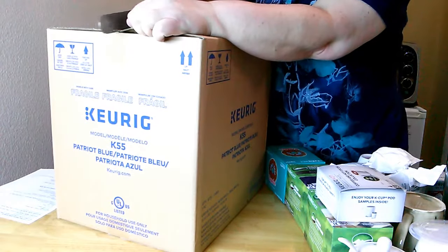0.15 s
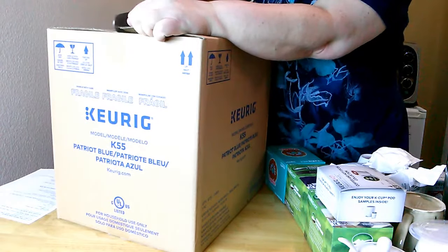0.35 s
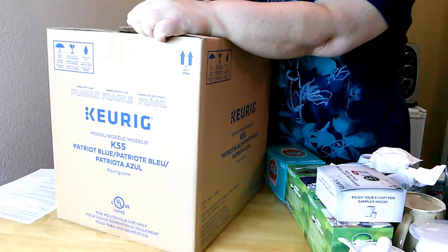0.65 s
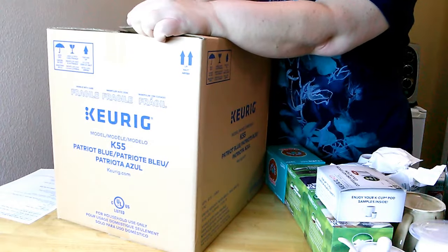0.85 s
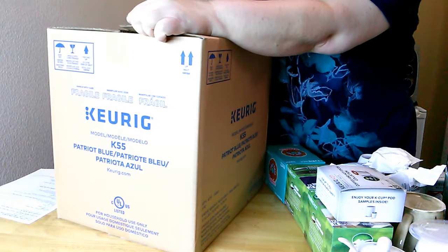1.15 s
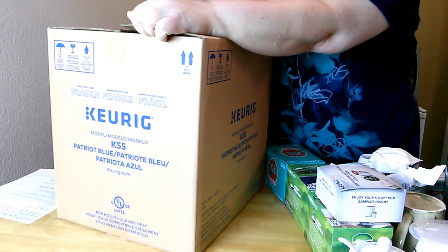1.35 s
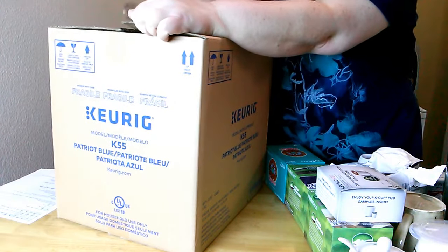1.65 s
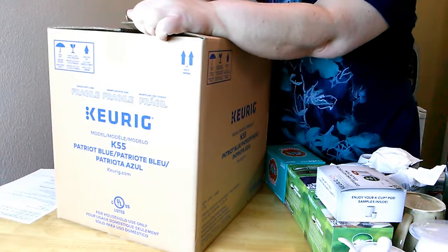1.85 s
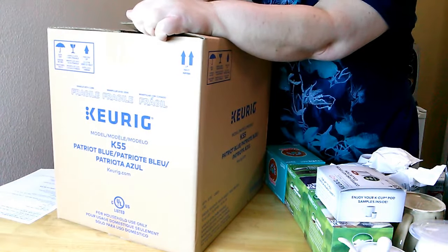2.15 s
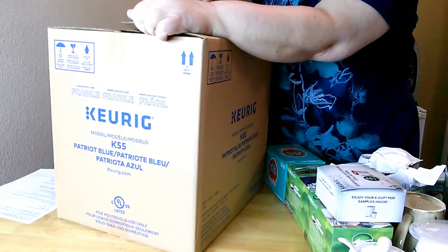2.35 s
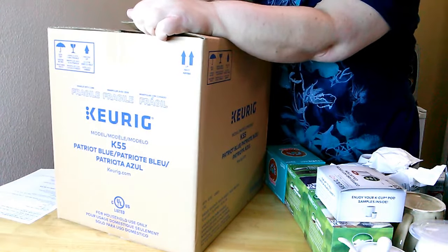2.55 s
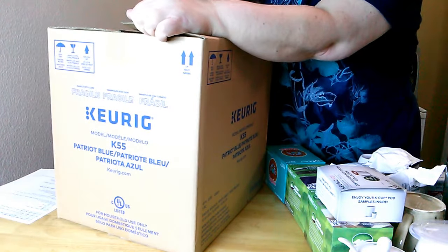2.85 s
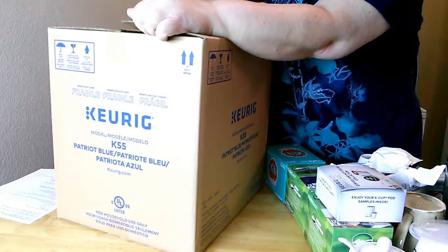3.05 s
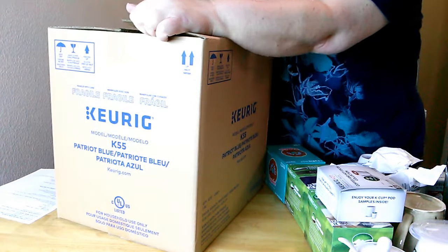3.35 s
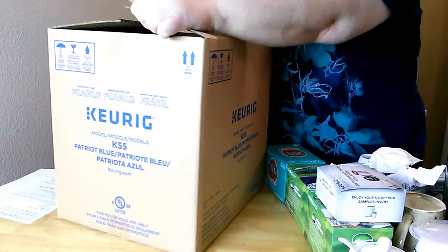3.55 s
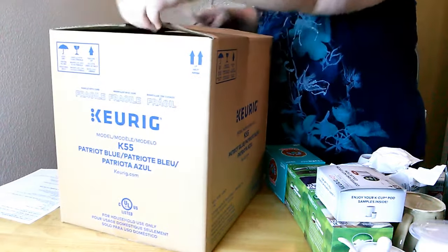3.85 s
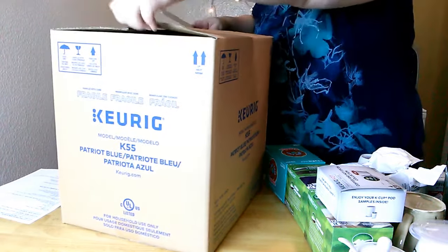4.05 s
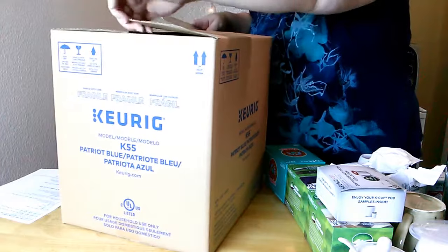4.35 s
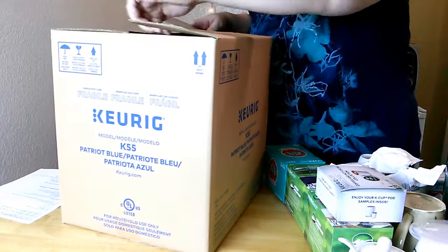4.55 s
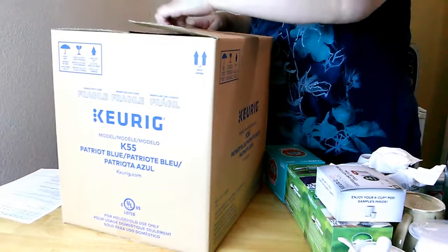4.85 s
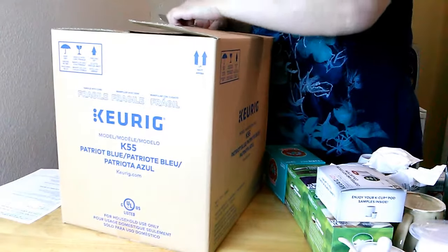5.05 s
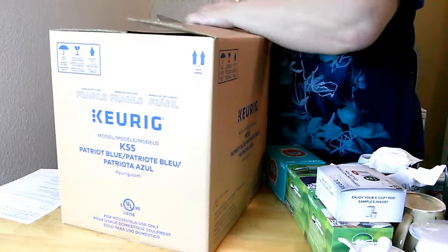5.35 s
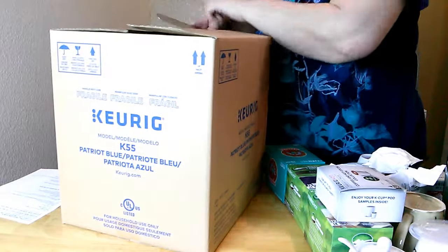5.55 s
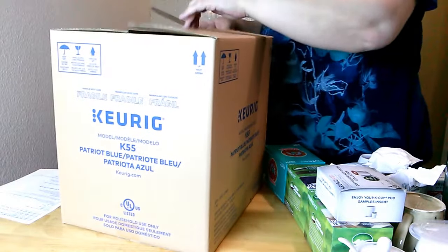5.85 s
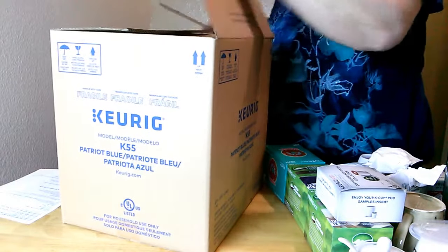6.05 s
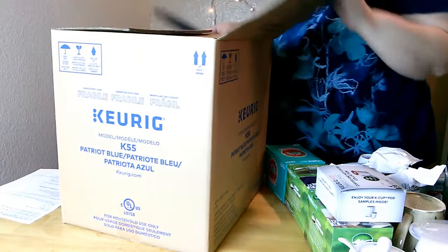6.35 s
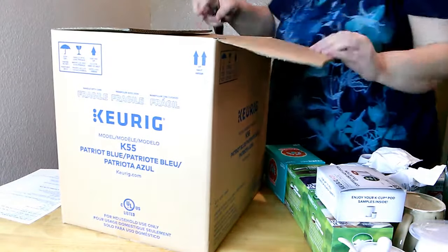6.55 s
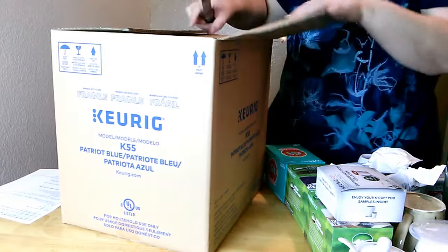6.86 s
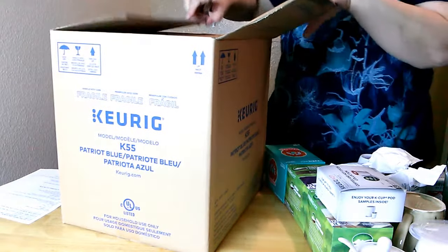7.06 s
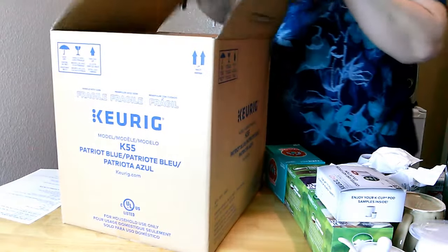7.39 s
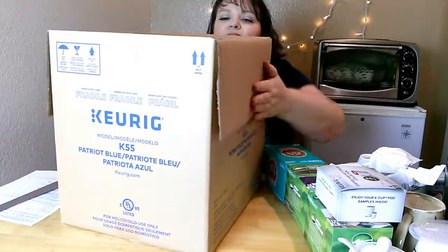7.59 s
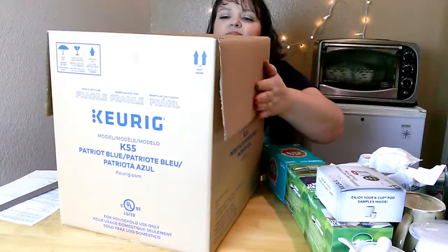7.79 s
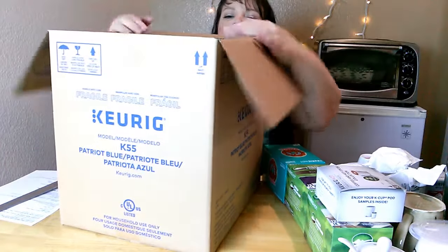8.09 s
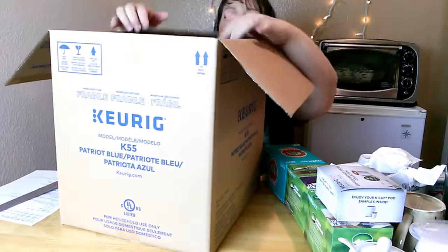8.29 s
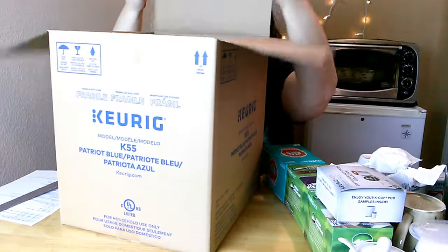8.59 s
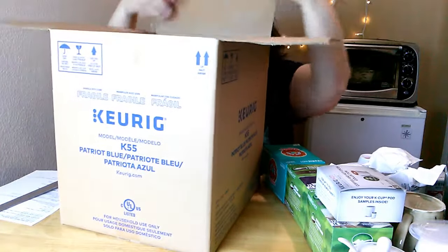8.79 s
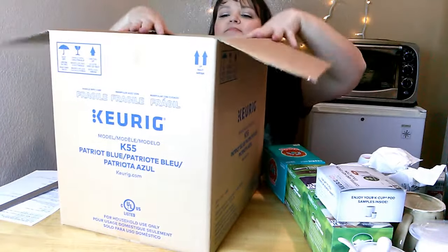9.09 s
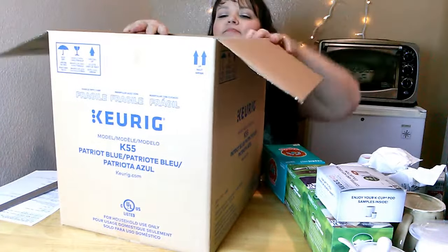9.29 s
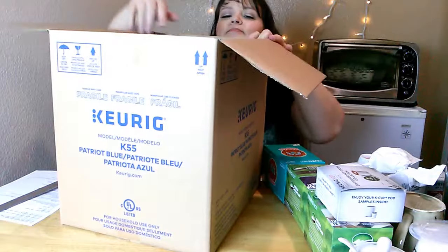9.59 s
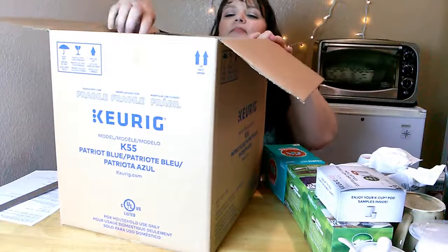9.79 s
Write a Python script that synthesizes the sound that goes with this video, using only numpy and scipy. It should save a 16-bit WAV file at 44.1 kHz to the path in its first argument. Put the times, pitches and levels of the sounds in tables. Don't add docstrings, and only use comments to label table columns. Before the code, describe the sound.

Hands work a large carton on a table. Tape snaps and hollow knocks come irregularly with dry scraping, then a cluster of ripping cracks as the flaps come loose. A quieter stretch of light rubbing and small squeaks follows, ending in flap thumps and rustles. Close microphone, small indoor room, quiet gaps nearly silent.

```python
import sys
import numpy as np
from scipy import signal
from scipy.io import wavfile
from scipy.ndimage import uniform_filter1d

SR = 44100
rng = np.random.default_rng(int(sys.argv[2]) if len(sys.argv) > 2 else 0)


def boost(x):
    u = np.asarray(x, float) / 20
    return 10 ** u


def int16_out(signal):
    q = np.round(np.clip(np.atleast_2d(signal).T, -1, 1) * 32767)
    wavfile.write(sys.argv[1], SR, q.astype(np.int16))


N = 437902

# centre in Hz, width in Hz, level in dB.
DEEP_MODES = [(67.8, 4.6, -6.5), (95, 7.5, -3.5), (136, 34, -3), (173, 54.5, -3.5), (245, 30.5, -1.5),
              (310.4, 41, -5)]
# centre in Hz, width in Hz, level in dB.
PANEL_MODES = [(349.2, 26.7, -1.5), (383, 41, 0.5), (423, 40, -2.5), (490.6, 22, -3), (558, 78, -4.5),
               (660, 250, -12)]


def evened(x):
    return x / np.sqrt(np.mean(x ** 2) + 1e-20)


def read(points, hz):
    f, value = np.transpose(points)
    return np.interp(np.log(hz + 1), np.log(f + 1), value)


def colour(x, points):
    hz = abs(np.fft.fftfreq(4096, 1 / SR))
    log_gain = np.log(boost(np.maximum(read(points, hz), -100)))
    minimum_phase = np.exp(np.conj(signal.hilbert(log_gain)))
    taps = np.fft.ifft(minimum_phase).real[:2048]
    return signal.oaconvolve(x, taps / np.linalg.norm(taps))[:N]


def add(mix, s, sound):
    part = mix[round(s * SR):][:len(sound)]
    part += sound[:len(part)]


def resonate(x, hz, width):
    r = np.exp(-np.pi * width / SR)
    turn = np.exp(2j * np.pi * hz / SR)
    return 2 * signal.lfilter([1 - r], [1, -r * turn], x).real


def ring(x, modes):
    total = 0
    for k, (hz, width, db) in enumerate(modes):
        total = total + (-1) ** k * boost(db) * resonate(x, hz, width)
    return total


def box(x):
    return ring(x, DEEP_MODES + PANEL_MODES)


def card(x):
    # frequency in Hz, level in dB per Hz.
    creak_colour = [(260, -25), (450, -1.5), (584, -11), (668, -7), (1040, -7.5), (1240, -5.5), (2310, -14),
                    (4500, -28.5), (5850, -36), (9900, -120)]
    # centre in Hz, width in Hz, level in dB.
    flap_modes = [(821, 110, 5), (1290, 250, -6.5), (1510, 40, -11.5), (2200, 370, -6)]
    return colour(x + boost(-8.5) * ring(x, flap_modes), creak_colour)


def slips(per_s, spread_db, last_s, flutter_db, flutter_s):
    size = boost(spread_db * np.minimum(rng.exponential(1, N), 4))
    jumps = size * (rng.random(N) < per_s / SR)
    grip = signal.lfilter([1], [1, -np.exp(-1 / (last_s * SR))], jumps)
    span = int(flutter_s * SR)
    flutter = evened(uniform_filter1d(uniform_filter1d(rng.standard_normal(N), span), span))
    return evened((1 + grip) * boost(flutter_db * flutter) * rng.standard_normal(N))


def patchy(x, patchy_db, bins, frames):
    z = signal.stft(x, nperseg=256)[2]
    field = uniform_filter1d(rng.standard_normal(z.shape), bins, 0)
    field = uniform_filter1d(field, frames, 1)
    return evened(signal.istft(z * boost(patchy_db * evened(field)), nperseg=256)[1][:N])


def pressure(strokes):
    press_db, sag_db_per_s, lift_db_per_s = 22.5, 12.5, 235
    t = np.arange(0, N / SR + .01, .002)
    s, press, hold, db, over_db = np.transpose(strokes)[:, :, None]
    before, after = np.maximum(s - t, 0), np.maximum(t - s, 0)
    shape = db - press_db * before / np.maximum(press, .002)
    shape = shape - sag_db_per_s * np.minimum(after, hold)
    shape = shape - lift_db_per_s * np.maximum(after - hold, 0)
    levels = []
    for level in (shape, shape + over_db):
        total_db = 10 * np.log10((boost(level) ** 2).sum(0) + 1e-10)
        levels.append(np.interp(np.arange(N) / SR, t, total_db))
    return levels


def snaps():
    # start in seconds, crack in dB, dull
    # part in dB over the crack.
    snap_events = [(0.0486, -34.5, 3), (0.3634, -35, -13), (0.4714, 7, -14.5), (0.5332, 3, -20),
                   (0.6013, -13, -14.5), (0.6298, -2, -17), (0.6595, 0, -11.5), (0.7172, -12.5, -31),
                   (0.837, -19.5, -8), (1.0231, -14, -5), (1.126, -26, -4), (1.483, -28, -5),
                   (1.601, -16.5, -17), (1.7546, -34, 16.5), (1.8819, -22, 4), (1.937, -17.5, -24),
                   (2.0802, -20.5, 1), (2.2493, -17.5, 6.5), (2.3902, -13.5, 2.5), (2.4304, -11, 1),
                   (3.0653, -16.5, -1.5), (3.184, -14.5, -5.5), (3.266, -14, -40),
                   (3.516, -52, -4), (3.5585, -17.5, -5), (3.5827, -5.5, -24), (3.6007, 1.5, -10),
                  (3.897, -32, 6.5), (4.1236, -19, -7), (4.3038, -29.5, 9.5), (4.442, -23, -8.5),
                  (4.695, -3.5, -6.5), (4.7314, -11, -11), (4.803, -11.5, -2.5), (4.851, -8, -5.5),
                  (4.9118, -5, -3.5), (4.984, -3, -11), (5.024, 5, -5.5), (5.093, -2, -3),
                  (5.1486, -5.5, -19.5), (5.1903, -9.5, -4), (5.3728, -9.5, 6.5), (5.3924, -3.5, -3),
                  (5.469, 6.5, 2), (5.767, -42, 12.5),
                   (6.12, -18, -20), (6.168, -20, -1.5), (6.2459, -44, 22), (6.4378, -20, -10),
                  (6.777, -35, 7), (7.3952, -24, -19), (7.701, -25, 21.5), (7.7226, -29.5, 18),
                  (8.449, -8.5, -3), (8.544, -17, 7.5), (8.5828, -2, -8), (8.7504, -20.5, 8.5),
                  (9.363, -35, 9), (9.8798, -39, 17)]
    # frequency in Hz, level in dB per Hz.
    crack_colour = [(1200, -25), (2000, -3), (4000, -6.5), (5600, -2.5), (6700, -4.5), (8000, -12),
                    (12000, -17.5), (16000, -33)]
    t60_s = 0.047
    t, bright, dull = np.arange(5000) / SR, np.zeros(N), np.zeros(N)
    for s, db, dull_db in snap_events:
        a, b, ragged = rng.standard_normal((3, len(t)))
        shape = boost(-60 * t / t60_s) * boost(2.25 * evened(uniform_filter1d(ragged, 90)))
        tear_hz = 5200 * np.exp(0.2 * np.clip(b[0], -2, 1))
        a = evened(a + 0.8 * evened(resonate(a, tear_hz, 700)))
        tick = 2.0 * boost(-60 * t / 0.00096) * np.sign(a)
        burst = shape * (1 - np.exp(-t / 0.0018)) * a
        add(bright, s, boost(db - 11.0) * (burst + tick))
        add(dull, s, boost(db + dull_db - 6.0) * shape * (1 - np.exp(-t / 0.0014)) * b)
    return colour(bright, crack_colour) + card(dull)


def knocks():
    # start in seconds, blow in dB, pitch of the struck panel
    # in Hz, t60 in seconds, hardness in dB.
    knock_events = [(0.054, -21, 85.4, 0.18, 6), (0.473, -2, 423, 0.026, 4), (0.489, -3.5, 580, 0.055, -1),
                    (0.837, -13, 173, 0.049, 15), (0.878, -13.5, 164, 0.096, 4), (0.94, -18, 251, 0.2, -12),
                    (1.261, -19.5, 367, 0.19, -15), (1.492, -24, 352, 0.14, -18),
                    (1.757, -12.5, 383, 0.033, 9), (1.878, -13, 404, 0.092, 6), (1.88, -10, 95, 0.12, -20),
                    (2.088, -1, 440, 0.063, -3), (2.089, -22, 165, 0.11, -18), (2.257, -2.5, 155, 0.045, -15),
                    (2.388, -10.5, 335, 0.058, 10.5), (2.608, -10.5, 221, 0.59, -3),
                    (3.004, -12, 266, 0.14, 1), (3.389, -21.5, 136, 0.12, -5), (3.5779, 0, 425, 0.043, -2),
                    (3.897, -24, 393, 0.053, 3), (4.147, -13, 390, 0.31, -17),
                    (4.689, -23, 554, 0.049, -16.5), (4.804, -23.5, 246, 0.45, 3),
                    (4.905, -15, 423, 0.099, -4.5), (4.979, -18, 423, 0.078, 12.5),
                  (5.019, -13.5, 418, 0.22, 2), (5.093, -10, 417, 0.061, -2.5), (5.369, -9, 520, 0.12, -2),
                  (5.476, 0.5, 430.5, 0.38, -2), (5.495, -7, 174, 0.21, -16.5), (5.694, -24, 320, 0.41, 2),
                  (5.954, -16.5, 370, 0.082, -11), (6.242, -21, 460, 0.13, -3),
                  (7.719, -3, 802, 0.043, 10.5), (7.7252, 1.5, 142, 0.17, -17), (8.141, -9, 129, 0.13, -23),
                  (9.875, -5.5, 727, 0.15, -4), (8.582, -22, 387, 0.053, 13), (8.744, -3, 177, 0.082, -5),
                  (8.7533, -6, 400, 0.061, -16), (8.914, -14.5, 143, 0.17, -24),
                  (9.742, -18.5, 162, 0.34, 4), (9.874, 2.5, 192.6, 0.11, -12)]
    t, panel, rattle = np.arange(8000) / SR, np.zeros(N), np.zeros(N)
    for s, db, hz, t60, hard_db in knock_events:
        noise = rng.standard_normal(len(t))
        tone = np.sin(2 * np.pi * hz * t)
        fall = boost(db - 60 * t / np.clip(t60, .03, .5)) * (1 - np.exp(-t / 0.0017))
        shove = 0.47 * boost(db - 60 * t / 0.086) * tone
        wobble = evened(resonate(resonate(noise, hz, 140), hz, 160))
        add(panel, s + 0.00293, shove + fall * (0.28 * tone + 0.39 * wobble))
        add(rattle, s + 0.003277, boost(hard_db) * fall * noise)
    return boost(-3.0) * panel + boost(10.0) * box(rattle) + boost(-20.0) * card(rattle)


def rubbing():
    # full pressure at seconds, press in seconds, hold in
    # seconds, scrape in dB, creak in dB over the scrape.
    rub_strokes = [(0.046, 0.004, 0.015, -45, 4), (.09, .03, 0.017, -46, 13.5), (.14, .05, 0.23, -46, -16),
                   (0.361, 0.003, 0.34, -37, 0), (0.474, 0.0031, 0.005, -13, 5),
                   (0.669, 0.2, 0.035, -27.5, -0.5), (0.76, 0.075, 0.043, -37, 7.5),
                   (0.843, 0.022, 0.05, -38, 9.5), (.94, .03, 0.22, -39, -6), (1.026, 0.01, 0.22, -45, 7),
                   (1.33, 0.026, 0.0077, -44.5, 2.5), (1.506, 0.079, 0.06, -39, 4),
                   (1.61, 0.054, 0.17, -38.5, 7), (1.882, 0.016, 0.012, -46, 16.5),
                   (1.94, .005, 0.024, -39.5, 1), (2.081, 0.0068, 0.012, -20.5, 3.5),
                   (2.249, 0.0088, 0.19, -33, 4), (2.389, 0.01, 0.9, -28.5, -3.5),
                   (2.652, 0.22, 0.2, -23, -4.5), (3.059, 0.26, 0.14, -30.5, -10),
                   (3.37, 0.006, 0.043, -45, 1.5), (3.44, .005, 0.019, -47, 0),
                   (3.606, 0.08, 0.022, -16, -1), (3.72, .03, 0.017, -42.5, 7), (3.8, 0.059, 0.019, -41, 1),
                   (3.9, 0.04, 0.021, -40, 5.5), (4.134, 0.12, 0.11, -38.5, 2),
                   (4.299, 0.0037, 0.45, -57, 11.5),
                   (4.743, 0.38, 0.018, -36, 5.5), (4.854, 0.018, 0.0077, -24.5, -1),
                    (4.932, 0.0044, 0.078, -34, -1.5), (5.042, 0.034, 0.006, -16, -0.5),
                    (5.082, 0.021, 0.1, -22.5, -1.5), (5.313, 0.046, 0.09, -44, -0.5),
                    (5.377, 0.0081, 0.0037, -12, 0), (5.465, 0.0047, 0.068, -18.5, 4),
                    (5.762, 0.005, 0.029, -47.5, 10.5), (5.962, 0.0043, 0.15, -49.5, 4),
                    (6.115, 0.006, 0.081, -37, 1), (6.248, 0.006, 0.011, -55.5, 23.5),
                    (6.426, 0.062, 0.14, -46.5, -2), (6.798, 0.5, 0.054, -47.5, -3.5),
                    (6.993, 0.041, 0.03, -40, 12), (7.029, 0.048, 0.033, -34, 6.5),
                    (7.11, 0.14, 0.038, -34.5, -4.5), (7.311, 0.4, 0.16, -56, 6),
                    (7.54, 0.081, 0.033, -29.5, 1), (7.668, .06, 0.02, -48, 10),
                    (7.738, 0.12, 0.037, -29, 7), (8.151, 0.23, 0.234, -25, -5),
                    (8.448, 0.084, 0.041, -29, 4.5), (8.611, 0.14, 0.17, -29, -0.5),
                    (8.96, 0.033, 0.038, -42.5, 4), (9.02, 0.22, 0.1, -42, 4.5),
                    (9.147, 0.1, 0.2, -48.5, 5), (9.357, 0.013, 0.091, -35.5, 3),
                    (9.504, 0.32, 0.17, -35, 3), (9.726, 0.013, 0.024, -33.5, 1.5),
                    (9.88, 0.037, 0.039, -41, 9)]
    # full pressure at seconds, press in seconds, hold in seconds, rumble
    # in dB, shudder in dB over the rumble.
    wall_pushes = [(0.08, 0.11, 0.2, -43.5, 3), (0.386, 0.027, 0.068, -34, -2),
                   (0.49, 0.033, 0.0047, -14.5, 1), (0.67, 0.044, 0.041, -33, -8),
                   (0.86, 0.34, 0.41, -34, 10.5), (1.55, 0.082, 0.18, -25.5, 4),
                   (1.881, 0.021, 0.012, -27.5, 3), (2.084, 0.01, 0.0054, -14.5, 4),
                   (2.25, 0.0051, 0.039, -22, -1), (2.4, 0.042, 0.11, -26.5, -0.5),
                   (2.65, 0.2, 0.18, -24.5, 4.5), (3.05, 0.44, 0.14, -25, 2), (3.39, .02, 0.029, -42.5, 6.5),
                   (3.584, 0.0069, 0.016, -6, -4), (3.9, 0.55, 0.03, -41, 1.5),
                   (4.15, 0.19, 0.071, -36.5, 3.5),
                   (4.546, 0.4, 0.18, -38.5, -4), (4.693, 0.012, 0.27, -33.5, -1.5),
                   (5.013, 0.011, 0.2, -35, 2), (5.477, 0.017, 0.044, -12, -4),
                   (5.966, 0.0061, 0.1, -37.5, 8.5), (6.26, 0.0092, 0.025, -36, -5),
                   (6.428, .02, 0.14, -42.5, -1.5), (6.794, 0.21, 0.013, -37, -5),
                   (7.018, 0.066, 0.081, -36, -0.5), (7.568, 0.06, 0.061, -30, -2),
                   (7.68, 0.058, 0.049, -35, 3), (7.746, 0.033, 0.042, -20.5, -2),
                   (8.088, 1, 0.49, -35, -0.5), (8.264, 0.036, 0.02, -29, 0),
                   (8.44, 0.083, 0.26, -26.5, -2), (8.747, 0.0026, 0.0039, -8, -10.5),
                   (9.036, 0.14, 0.07, -28, -1), (9.42, 0.2, 0.28, -34, 3), (9.754, 0.027, 0.016, -32, -18),
                   (9.873, 0.0041, 0.03, -16, -2)]
    # frequency in Hz, level in dB per Hz.
    scrape_colour = [(1060, -28), (1800, -2.5), (2870, -2), (4000, -2.5), (5850, -0.5), (7840, -12.5),
                     (11800, -20.5), (16000, -43)]

    levels = pressure(rub_strokes) + pressure(wall_pushes)
    levels = [c - 0.036 * np.maximum(c + 24, 0) for c in levels]
    scrape, creak, rumble, shudder = (boost(c - 3.5) for c in levels)

    hiss = slips(per_s=320, spread_db=-4.5, last_s=0.0022, flutter_db=0.5, flutter_s=0.018)
    hiss = patchy(colour(hiss, scrape_colour), patchy_db=1.9, bins=3, frames=8)
    flaps = card(slips(per_s=120, spread_db=2.0, last_s=0.0018, flutter_db=-0.5, flutter_s=0.027))
    flaps = patchy(flaps, patchy_db=1.8, bins=2, frames=20)
    walls = slips(per_s=90, spread_db=1.5, last_s=0.0097, flutter_db=1.7, flutter_s=0.041)
    walls = resonate(ring(walls, PANEL_MODES), 428, 370)
    body = slips(per_s=40, spread_db=-0.5, last_s=0.0015, flutter_db=0.6, flutter_s=0.041)
    body = resonate(ring(body, DEEP_MODES), 140, 220)

    slow_db = uniform_filter1d(np.minimum(levels[0], -36), size=5000)
    slow_db = np.minimum(slow_db, levels[0] + 10)
    fizz = np.diff(colour(rng.standard_normal(N), scrape_colour), n=3, prepend=[0, 0, 0])
    air = boost(-22.5 + 0.71 * slow_db) * fizz
    return air + scrape * hiss + creak * flaps + rumble * evened(walls) + shudder * evened(body)


def ticks():
    # start in seconds, level in dB, centre in Hz.
    fibre_ticks = [(0.7467, -17, 4110), (0.8485, -21, 4440), (1.131, -28, 12530), (1.329, -37, 5930),
                   (1.338, -39, 3500), (1.5085, -28.5, 5500), (1.7065, -24.5, 6000), (1.7918, -28, 5900),
                   (1.8545, -26.5, 4800), (1.878, -25, 1300), (2.0478, -37, 5500), (2.0907, -17, 8020),
                   (2.5831, -18, 2480), (3.0121, -37, 8970), (3.066, -25, 11000), (3.1468, -30, 9000),
                   (3.1632, -27, 7000), (3.187, -24, 11070), (3.265, -24, 10900), (3.3698, -33, 5960),
                   (3.4371, -31.5, 4500), (3.5149, -34, 1990), (3.5314, -32, 6020), (4.054, -31.5, 5500),
                   (4.4055, -41.5, 8000), (4.864, -15, 5000), (5.162, -11, 4500), (5.318, -42, 3500),
                   (5.422, -14, 1770), (5.7235, -40, 6980), (6.0199, -36, 5500), (6.5162, -34, 5500),
                   (6.7861, -31.5, 5740), (6.9792, -40, 1500), (7.394, -32, 9900), (7.4895, -34, 6000),
                   (7.5225, -33, 5500), (7.6487, -32, 2500), (7.724, -18, 1190), (7.762, -23, 5500),
                   (7.838, -34, 6960), (7.9355, -29, 2660), (7.9754, -45, 6000), (8.048, -22.5, 2100),
                   (8.352, -18, 1790), (8.4349, -18, 5260), (8.452, -13.5, 2890), (8.478, -16, 2800),
                   (8.5385, -12, 3200), (9.0231, -27, 5500), (9.3593, -41, 7000), (9.378, -40, 6000),
                   (9.4047, -39, 6000), (9.7175, -24, 4360), (9.7455, -14, 660), (9.862, -30, 900),
                   (9.876, -17, 1480)]
    t60_s, width_share = 0.062, 0.57
    t, out = np.arange(2500) / SR, np.zeros(N)
    for s, db, hz in fibre_ticks:
        width = width_share * hz
        puff = evened(resonate(resonate(rng.standard_normal(len(t)), hz, width), hz, width))
        add(out, s, boost(db - 7.0 - 60 * t / t60_s) * (1 - np.exp(-t / 0.0007)) * puff)
    return out


def squeak():
    # time in seconds, level in dB.
    course = [
        (6.42, -60),
        (6.44, -49),
        (6.6, -52),
        (6.76, -57),
        (6.79, -37),
        (6.87, -62),
        (6.93, -83),
        (7.045, -31),
        (7.2, -68.5),
    ]
    # centre in Hz, width in Hz, level in dB.
    hinge_modes = [(1420, 97, 2), (2450, 160, -11.5)]
    s, db = np.transpose(course)
    level = boost(np.interp(np.arange(N) / SR, s, db - 0.5, left=-120, right=-120))
    bending = slips(per_s=30, spread_db=1.5, last_s=0.012, flutter_db=3.0, flutter_s=0.01)
    return level * evened(ring(bending, hinge_modes))


def streaks():
    # start in seconds, length in seconds, level in dB, ring in Hz.
    flap_streaks = [(0.069, 0.037, -44, 1170), (0.139, 0.12, -55.5, 2370), (0.155, 0.16, -59, 4650),
                    (0.359, .12, -41.5, 2310), (0.36, 0.16, -44, 4660), (1.74, 0.055, -33, 824),
                    (2.406, 0.16, -42, 2030), (2.954, 0.13, -35.5, 1094), (2.898, .35, -46.5, 2030),
                    (5.008, .1, -34, 1300), (6.235, .05, -36, 1124), (6.768, 0.036, -45, 890),
                    (6.993, 0.11, -35, 1790), (7.503, 0.09, -37, 1135), (8.178, .08, -38, 2050),
                    (9.398, .3, -47.5, 3320)]
    t, out = np.arange(SR) / SR, np.zeros(N)
    for s, length, db, hz in flap_streaks:
        noise, ragged = rng.standard_normal((2, SR))
        width = 0.11 * hz
        rung = evened(resonate(resonate(noise, hz, width), hz, 2 * width))
        arch = abs(np.sin(np.pi * np.minimum(t / length, 1))) ** 1.3
        add(out, s, arch * boost(db + 4.8 * evened(uniform_filter1d(ragged, size=500))) * rung)
    return out


def brushing():
    # full pressure at seconds, press in seconds, hold in seconds, fizz in dB,
    # whistle in dB over the fizz.
    brushes = [(0.15, 0.079, 0.1, -72, 3.5), (0.8, .05, .1, -50, -4), (1.03, .01, 0.14, -50.5, 6.5),
               (1.15, .03, 0.044, -55, -2), (1.72, .05, 0.032, -57, 15), (2.68, .1, 0.28, -57, 4.5),
               (3.07, .03, 0.14, -46.5, -1), (3.38, .01, 0.083, -71, 9.5), (4.5, 0.14, 0.14, -54.5, 13.5),
               (4.8, 0.11, 0.27, -48.5, 8.5), (7.0, 0.12, 0.044, -54.5, 11), (7.32, .1, 0.066, -70, -9),
               (7.55, .05, 0.037, -55, 14), (8.14, 0.18, 0.074, -41.5, 7), (8.75, 0.12, 0.19, -47, -2),
               (9.0, 0.11, 0.055, -49.5, 7.5), (9.08, 0.054, 0.031, -47, 3), (9.38, .02, 0.062, -61, -8),
               (9.73, .02, 0.032, -56, -8)]
    # frequency in Hz, level in dB per Hz.
    fizz_colour = [(5000, -30.5), (8000, -1), (11500, -3.5), (14000, -9.5), (16000, -14)]
    whistle_hz, whistle_width_hz = 5350, 2400
    fizz, whistle = (boost(c) for c in pressure(brushes))
    grain = slips(per_s=140, spread_db=-1.0, last_s=0.003, flutter_db=2.5, flutter_s=0.02)
    breath = resonate(grain[::-1], whistle_hz, whistle_width_hz)
    breath = resonate(breath, whistle_hz, whistle_width_hz)
    return fizz * colour(grain, fizz_colour) + whistle * evened(breath)


def room(x):
    # frequency in Hz, t60 in seconds.
    decay = [(100, 0.3), (700, 0.25), (2000, 0.22), (5000, 0.29), (12000, 0.26)]
    at = np.arange(200, SR // 2 - 20, 20)
    out = np.zeros(N)
    for k in range(3):
        taps = np.zeros(SR // 2)
        taps[at + rng.integers(0, 20, len(at))] = rng.choice([-1., 1.], len(at))
        hz, t, z = signal.stft(taps, SR, nperseg=256)
        fall = boost(-60 * t / read(decay, hz)[:, None])
        tail = signal.istft(z * fall, SR, nperseg=256)[1]
        share = np.sqrt(2 / 3) * np.cos(np.pi * (7 * np.arange(N) / SR + k / 3))
        out += signal.fftconvolve(x * share, tail / np.linalg.norm(tail))[:N]
    return out


def room_tone():
    # frequency in Hz, level in dB per Hz.
    hum_colour = [(15, -38), (25, -5.5), (134, -5.5), (1190, -33.5), (16000, -48.5)]
    return boost(-44.5) * evened(colour(rng.standard_normal(N), hum_colour))


def scene():
    crack = snaps() + ticks()
    thud = knocks()
    rub = rubbing() + squeak() + brushing() + streaks()
    echo = room(boost(-6.0) * crack + boost(-9.0) * thud + boost(-8.0) * rub)
    return (crack + thud + rub + echo + room_tone())[None]


def roll_off(x):
    return signal.sosfilt(signal.butter(12, 16320, fs=SR, output="sos"), x)


def record(dry):
    since = np.arange(N) / SR - 7.601
    dipped = dry * boost(-12 * (since > 0) * np.exp(-(since / 0.035) ** 2))

    power_db = 10 * np.log10(abs(uniform_filter1d(dipped ** 2, size=300)) + 1e-12)
    gate_db = 0.68 * np.clip(power_db + 36, -26, 0)
    treble = signal.sosfilt(signal.butter(2, 800, "high", fs=SR, output="sos"), dipped)
    treble_db = 10 * np.log10(abs(uniform_filter1d(treble ** 2, size=800)) + 1e-12)
    shut = 1 - boost(1.5 * np.clip(treble_db + 55, -12, 0))
    gated = (dipped - shut * treble) * boost(gate_db)

    clipped = np.clip(gated, -1, 1)
    dulled = signal.oaconvolve(clipped, signal.firwin(255, 16000, fs=SR)[None], "same")
    return roll_off(dulled)


dry = scene()
out = record(dry)
int16_out(out)
```